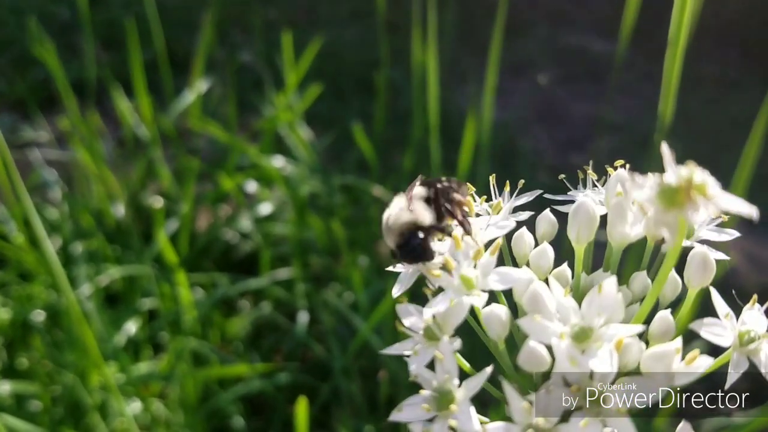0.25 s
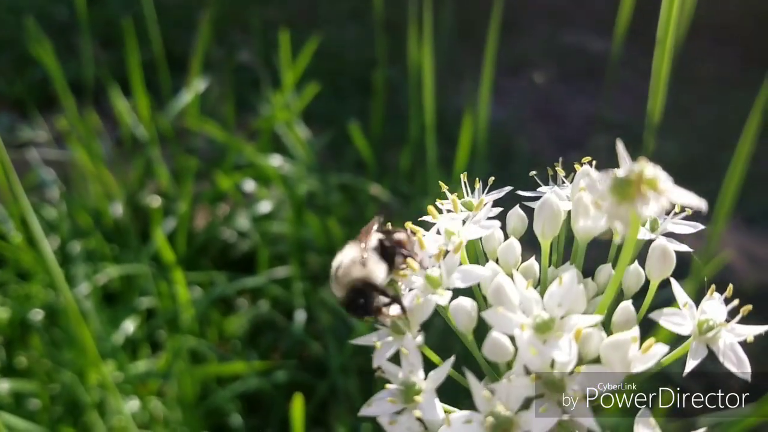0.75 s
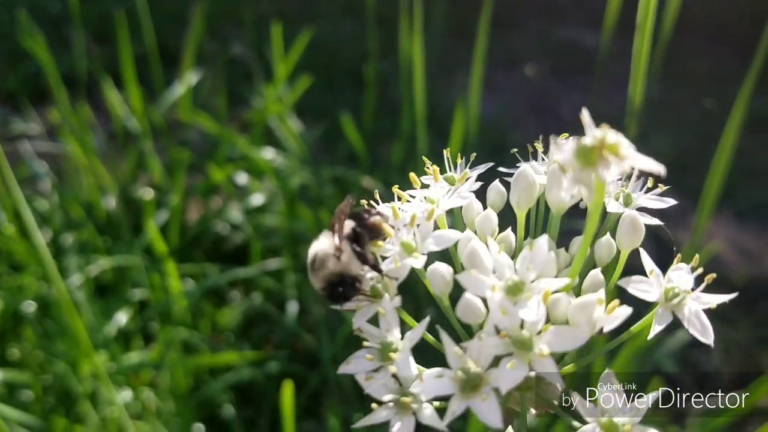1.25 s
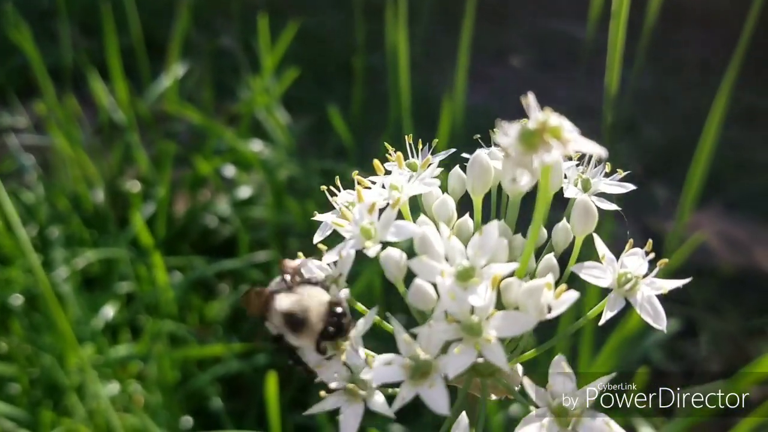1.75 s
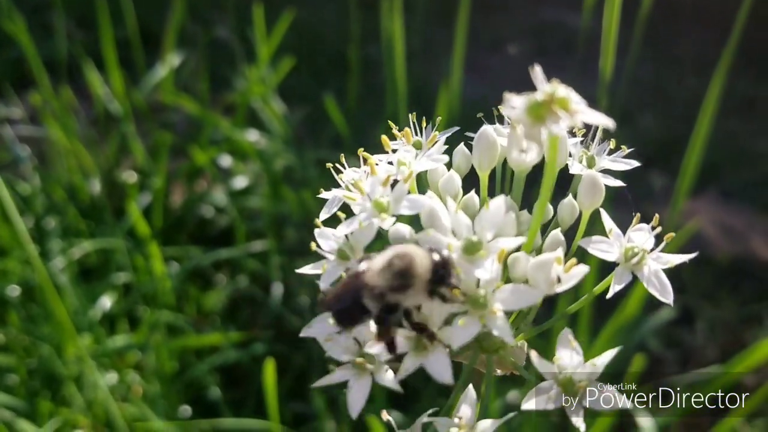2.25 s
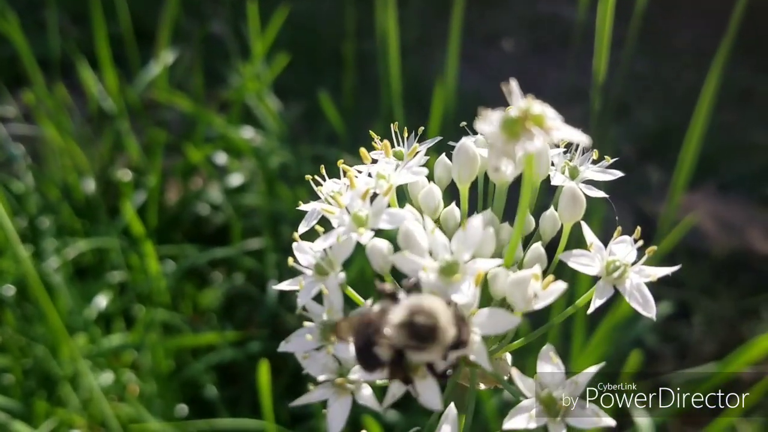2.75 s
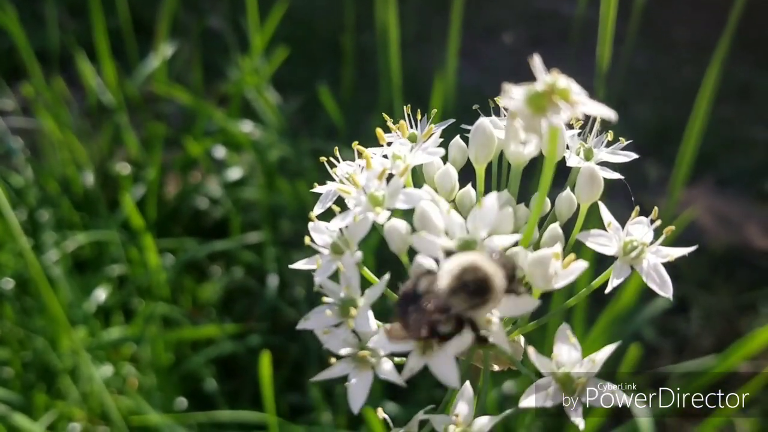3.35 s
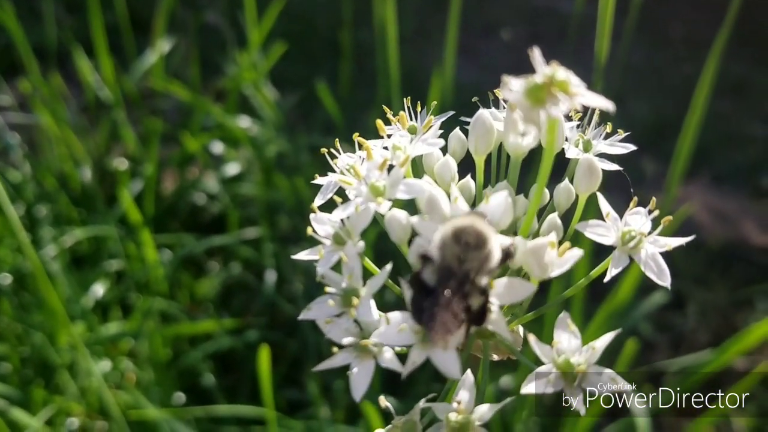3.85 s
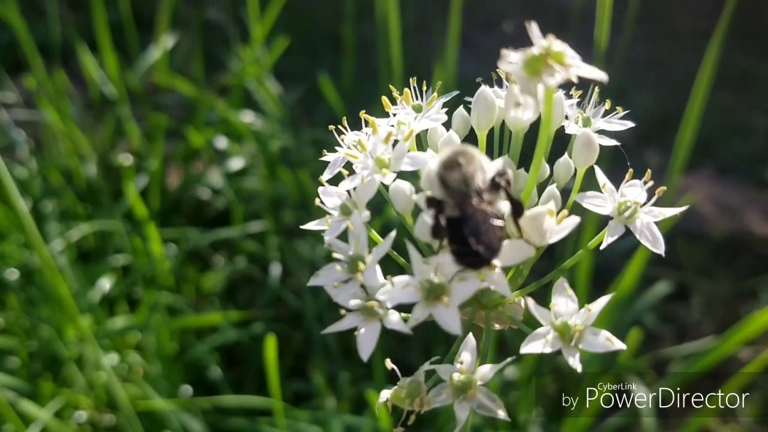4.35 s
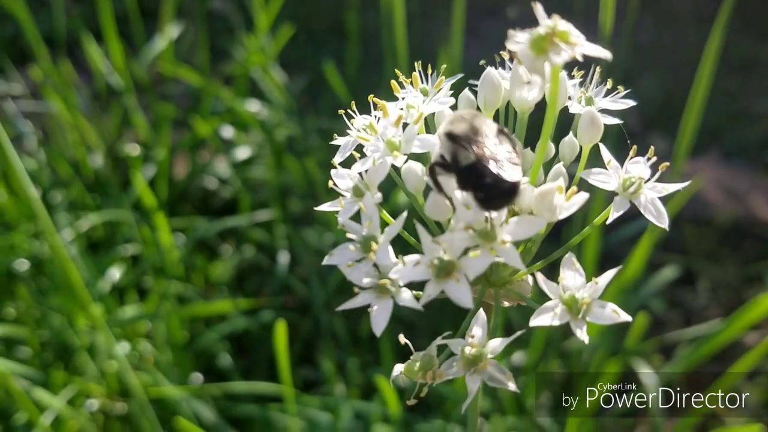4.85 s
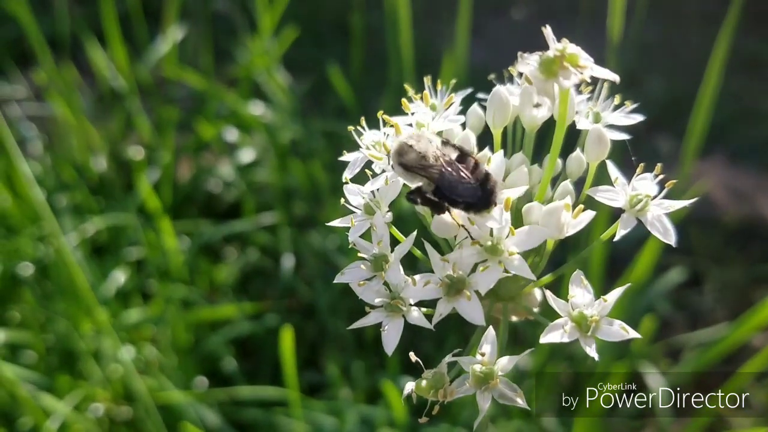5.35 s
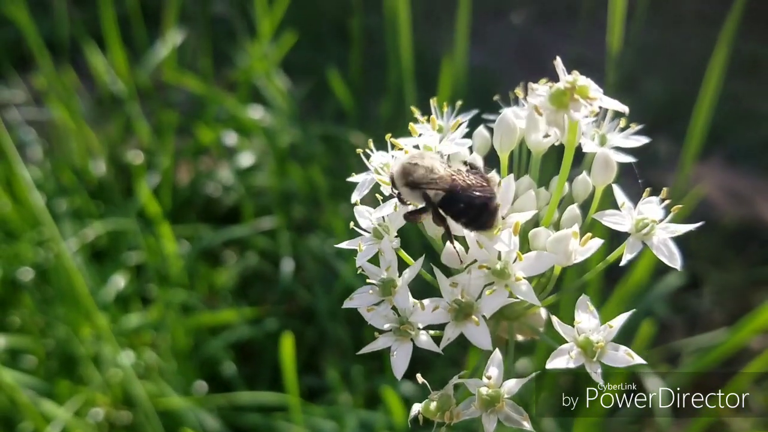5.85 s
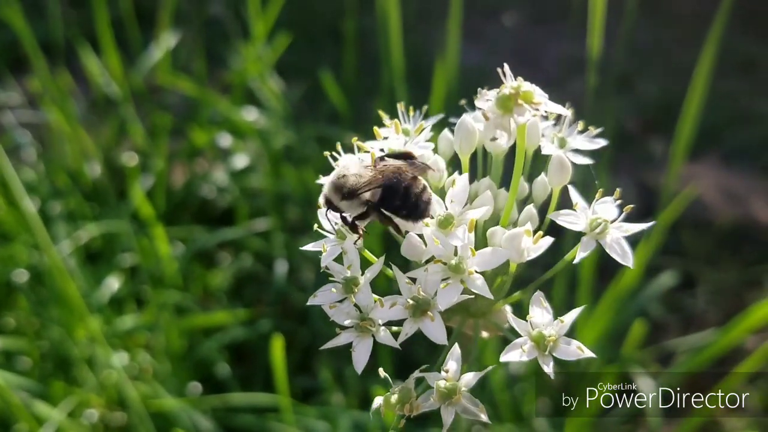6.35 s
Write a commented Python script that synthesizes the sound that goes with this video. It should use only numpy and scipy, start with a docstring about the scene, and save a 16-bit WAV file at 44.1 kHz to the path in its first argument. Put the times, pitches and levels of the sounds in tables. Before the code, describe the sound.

Outdoors in a grassy garden, a nearby cicada sings a shrill, rasping drone with rapid throbs. It swells until nearly three seconds, falters, then throbs faster while fading out before six. A steady far insect chorus remains, with faint high katydid rasps at the end. Low soft wind rumbles through the middle, and a cluster of dull knocks on the hand-held microphone lands around four and a half seconds.

```python
"""Cicada by a flower head

One cicada sings nearby: a tymbal's click train excites resonances, as a drone and quick throbs that swell
and die away; shaped noise stands for the song's high overtones. More of it makes a far insect chorus and
katydid rasps at the end. Low noise is wind on two microphone ports; damped sinusoids are soft knocks on
the hand-held body."""
import sys
import numpy as np
from scipy import signal
from scipy.fft import rfft, irfft
from scipy.io import wavfile
from scipy.ndimage import uniform_filter1d, map_coordinates

SR = 44100
rng = np.random.default_rng(int(sys.argv[2]) if len(sys.argv) > 2 else 0)


def persist_wave(psi):
    """Save psi, clipped to +-1, as 16-bit WAV."""
    counts = np.round(np.clip(psi, -1, 1) * 32767).astype(np.int16)
    wavfile.write(sys.argv[1], SR, np.atleast_2d(counts).T)


N = 291060

# tymbal action: (time [s], click rate [1/s], timing unevenness [fraction], basic share smeared into noise [0-1],
# early stroke relative level [dB])
TYMBAL_ACTION = [(0, 461.5, .007, .2, -6), (2.75, 461.5, .007, .2, -6), (3.05, 400, .02, .2, -10),
                 (3.3, 360, .015, .2, -12), (5.75, 350, .015, .2, -12)]
# phase between the ports, for song and far chorus: (frequency [Hz], lead of left over right [rad])
PORT_LEAD = [(0, -7.5), (1290, 4.5), (2930, -2), (3960, -3), (5340, -1.27), (5940, -2.5), (6290, -8.5),
             (6630, -1), (8700, -22), (13600, 26.5), (14600, 7), (15200, 29)]
LEFT_RIGHT = np.array([[.5], [-.5]])  # halves of a left-minus-right level difference


def amp(db):
    """Decibels are logarithmic: 20 dB is a tenfold gain."""
    return 10 ** (np.asarray(db) / 20)


def rms_one(x):
    """Normalise by the root of the mean power, to rms 1."""
    return x / np.sqrt(np.mean(x ** 2) + 1e-20)


def in_time(rows):
    """Linear interpolation of a table's columns over time, at every sample."""
    s, *columns = np.transpose(rows)
    return [np.interp(np.arange(N) / SR, s, column) for column in columns]


def at_hz(points):
    """Interpolation on a logarithmic frequency axis, at every FFT bin."""
    hz, value = np.transpose(points)
    bin_hz = np.arange(N // 2 + 1) * SR / N
    return np.interp(np.log(bin_hz + 1), np.log(hz + 1), value)


def colour(x, spectrum, peaks=()):
    """Source-filter principle: a spectral envelope with bell-shaped peaks or dips filters x; rms 1."""
    hz = np.arange(N // 2 + 1) * SR / N
    db = at_hz(spectrum)
    for centre_hz, width_hz, top_db in peaks:
        db = db + top_db / (1 + ((hz - centre_hz) / width_hz) ** 2)
    outside = (hz < spectrum[0][0]) | (hz > spectrum[-1][0])
    db[outside] -= 30
    return rms_one(irfft(rfft(x) * amp(db), N))


def drift(rate):
    """Band-limited chance: random knots, rate per second, joined by a smooth spline."""
    knots = rng.standard_normal(int(N / SR * rate) + 4)
    return map_coordinates(knots, [1 + np.arange(N) / SR * rate], order=2)


def sides(x, other, alike, lead=0, pan_db=0):
    """Coherence of two ports: the right hears x shifted in phase, partly replaced by another sound."""
    alike = np.clip(alike, 0, 1)
    shared = alike * rfft(x) * np.exp(-1j * lead)
    unshared = np.sqrt(1 - alike ** 2) * rfft(other)
    left = irfft(rfft(x) * amp(pan_db / 2), N)
    right = irfft((shared + unshared) * amp(-pan_db / 2), N)
    return np.array([left, right])


def pulses(times, levels_db, length_s, rise_s, fall_s):
    """Gate smoothing: averaging slopes each gate's edges, then a one-pole lag adds exponential decay."""
    gate = np.zeros(N)
    for s, db in zip(times, levels_db):
        gate[max(round(s * SR), 0):round((s + length_s) * SR)] = amp(db)
    gate = uniform_filter1d(gate, max(round(rise_s * SR), 1))
    pole = np.exp(-1 / (fall_s * SR))
    return signal.lfilter([1 - pole], [1, -pole], gate)


def cicada():
    """Resonant radiation: a drone hushes before each throb, which opens other resonances after a weak stroke."""
    # song: (time [s], drone level [dB], throb level [dB]), before gating, falters and pan
    song_levels = [(0, -37.5, -34), (.5, -36.3, -34.5), (1, -36.5, -31.5), (1.5, -34, -30.3),
                   (1.9, -32.5, -30), (2.78, -33.5, -31.5), (2.88, -36.5, -32.5), (3.5, -37, -33),
                   (4, -38.5, -34.5), (4.5, -41, -35), (4.9, -41.5, -37.5), (5.05, -46, -38.5),
                   (5.3, -49, -40), (5.62, -52, -41), (5.75, -61, -50)]
    # drone and throb envelopes: (frequency [Hz], relative density [dB per Hz])
    drone_tone = [(1700, -52), (2100, -28.5), (2630, -22), (3140, -14), (3950, -14), (4500, -15),
                  (4900, -9), (5500, -7.5), (5900, -0.5), (6300, -9), (6750, -13), (7200, -22), (8200, -53)]
    throb_tone = [(4300, -12.5), (4700, -8), (4900, -6), (5300, 2.5), (5600, -5), (5900, 0), (6400, 2),
                  (6800, -16.5), (7400, -22.5)]
    # drone and throb resonances, dips negative: (frequency [Hz], half-width [Hz], height [dB])
    drone_peaks = [(2790, 30, 7), (3210, 50, 6), (3492, 25, 6), (3687, 30, 6), (4000, 110, 7),
                   (4445, 45, 6), (4210, 45, -7), (3790, 25, -5), (6215, 65, 9), (6390, 35, -4),
                   (6490, 70, 8), (6620, 70, 4), (5400, 35, -5), (6030, 40, -4)]
    throb_peaks = [(4790, 20, 2), (5400, 30, -5), (4931, 25, 4), (5091, 40, 7), (5163, 20, 4),
                   (5307, 45, 3.5), (5552, 40, 7), (5762, 30, 4), (5925, 35, 5)]
    # port balance beyond the pan: (frequency [Hz], left minus right [dB])
    song_tilt = [(2000, 5.5), (4000, -6), (5000, -6.5), (6300, 6), (7500, 13.5)]
    # pan: (time [s], left minus right [dB])
    song_pan = [(0.0, -2), (1.63, -3), (2.05, -1), (4.16, -2), (5.4, -4)]

    drone_db, throb_db = in_time(song_levels)
    s, over_db = throbs()
    body = pulses(s, over_db, length_s=.023, rise_s=.0015, fall_s=.002)
    onset = pulses(s, over_db, length_s=.006, rise_s=.001, fall_s=.006)
    early = pulses(s - .019, over_db, length_s=.012, rise_s=.0035, fall_s=.0027)
    early_db = in_time(TYMBAL_ACTION)[3]
    throb = .72 * body + .25 * onset + amp(early_db) * early

    hush = pulses(s - .010, 0 * s, length_s=.011, rise_s=.003, fall_s=.0015)
    # during a throb the drone gives way
    give_way = pulses(s, 0 * s, length_s=.026, rise_s=.003, fall_s=.0014)
    drone_gain = amp(drone_db + .46 * drift(40)) * (1 - .31 * hush) * (1 - .31 * give_way)

    lead, tilt_db = at_hz(PORT_LEAD), at_hz(song_tilt)
    scattered = rng.standard_normal(N)
    rough, clear = tymbal(smear_more=.55), tymbal(smear_more=0)
    drone_pair = [colour(x, drone_tone, drone_peaks) for x in (rough, scattered)]
    throb_pair = [colour(x, throb_tone, throb_peaks) for x in (clear, scattered)]
    drone = sides(*drone_pair, alike=.59, lead=lead, pan_db=tilt_db)
    beat = sides(*throb_pair, alike=.89, lead=lead, pan_db=tilt_db)
    song = drone_gain * drone + amp(throb_db) * throb * beat

    pan_db, = in_time(song_pan)
    fade = np.clip((song_levels[-1][0] - np.arange(N) / SR) / .1, 0, 1)  # over the last 0.1 s of song
    return song * fade * amp(falter_db() + pan_db * LEFT_RIGHT)


def tymbal(smear_more):
    """Buckling membrane: it snaps in, then out with opposite sign and less force; leaves smear a share to noise."""
    per_s, uneven, smear, _ = in_time(TYMBAL_ACTION)
    cycle = np.floor(np.cumsum(per_s * (1 + uneven * drift(60))) / SR)
    way = np.where(cycle % 2, 1, -.4)
    strength = amp(.71 * rng.standard_normal(N)) * way
    clicks = rms_one(np.diff(cycle, prepend=0) * strength)
    smear = np.clip(smear + smear_more, 0, 1)
    return np.sqrt(1 - smear) * clicks + np.sqrt(smear) * rng.standard_normal(N)


def throbs():
    """Quasi-periodic rhythm: belly throbs keep a changing pace, slightly uneven in time and strength."""
    # pace, even between rows: (time [s], throbs counted so far [count])
    pace = [(.058, 0), (1.150, 13), (1.735, 20), (2.812, 33), (2.897, 34), (3.201, 38), (3.675, 45),
            (3.862, 48), (4.630, 60), (5.164, 68), (5.441, 72), (5.518, 73), (5.612, 74)]
    jitter_s, spread_db = .001, .7  # standard deviations
    s, counted = np.transpose(pace)
    number = np.arange(counted[-1] + 1)
    chance = rng.standard_normal((len(number), 2))
    times = np.interp(number, counted, s) + jitter_s * chance[:, 0]
    return times, spread_db * chance[:, 1]


def falter_db():
    """Amplitude modulation: the drone and throbs falter in short soft-edged drops as the song changes pace."""
    # falters: (time [s], length [s], drop [dB])
    falters = [(3.024, .03, 8.0), (3.097, .03, 5.0)]
    edge_s = .008
    t = np.arange(N) / SR
    drop = sum(db * ((t > s) & (t < s + length_s)) for s, length_s, db in falters)
    return -uniform_filter1d(drop, round(edge_s * SR))


def overtones():
    """Band-limited noise for the high overtones of the cicada's song: they waver, and fade as it ends."""
    # level: (time [s], mean level midway between ports [dB])
    overtone_levels = [(0.0, -53), (1.56, -53.5), (2.52, -52), (2.98, -54.5), (3.4, -53), (4.61, -55),
                       (4.87, -57), (6.13, -72)]
    # envelope: (frequency [Hz], relative density [dB per Hz])
    overtone_tone = [(5240, -87), (8900, -2), (10500, 3.5), (12700, 4), (14900, -2.5), (15500, -27)]
    pan_db = -2.5  # left minus right
    high = np.array([colour(w, overtone_tone) for w in rng.standard_normal((2, N))])
    level_db = in_time(overtone_levels)[0] + 1.0 * drift(7.3)
    return amp(level_db) * amp(pan_db * LEFT_RIGHT) * high


def knocks():
    """Damped oscillation: each knock dips, then rings at a sagging pitch; the soft contact dulls its edge."""
    # knocks on the body: (time [s], peak level midway between ports [dB], settled frequency [Hz],
    # ringing to fall 30 dB [cycles of that frequency])
    knock_rows = [(.770, -42.5, 193, 1.6), (0.824, -46, 152, 2.1), (.993, -46, 203, 3.4),
                  (2.125, -47, 228, 5.2), (4.3705, -29, 74.6, 3.9), (4.4089, -22, 87, 1.8),
                  (4.462, -37.5, 65, 5.8), (4.494, -49, 109, 3.3), (4.587, -34, 94, 6.4),
                  (4.603, -43.5, 328, 2.5), (4.609, -39.5, 410, 1.3), (4.611, -28, 94.5, 2.1),
                  (4.641, -38, 76, 4.0), (4.7256, -29, 183, 1.1), (5.205, -42.5, 171, 1.7),
                  (5.762, -49, 200, 1.7)]
    pan_db = -10  # left minus right
    out = np.zeros((2, N))
    t = np.arange(round(.12 * SR)) / SR
    for s, peak_db, hz, cycles in knock_rows:
        turns = hz * t + .46 * (1 - np.exp(-t * hz / .25))  # starts high, sags to hz
        onset = 1 - np.exp(-(t * hz / .19) ** 2)
        swing = -np.sin(2 * np.pi * turns) * onset * amp(-30 * t * hz / cycles)
        dull = signal.butter(4, max(430, 2.2 * hz), fs=SR, output="sos")
        swing = signal.sosfilt(dull, swing)
        at = round(s * SR)
        out[:, at:at + len(t)] += amp(peak_db + pan_db * LEFT_RIGHT) * swing / np.abs(swing).max()
    return out


def wind():
    """Turbulent pressure noise, stronger on the right port: one long gust rises from the calm, holds and drops."""
    # wind envelope: (frequency [Hz], relative density [dB per Hz])
    wind_tone = [(13, -43), (22, -16), (44, -3.5), (108, 1), (210, -8), (258, -14), (318, -20.5),
                 (350, -31.5), (400, -27.5), (520, -44), (880, -120)]
    calm_db, gust_db = -61.5, -49.5  # means midway between ports
    start_s, rise_s, end_s, fall_s = .89, .65, 4.67, .4
    turning_s = [start_s, start_s + rise_s, end_s, end_s + fall_s]
    level_db = np.interp(np.arange(N) / SR, turning_s, [calm_db, gust_db, gust_db, calm_db])
    gusts = [colour(w, wind_tone) for w in rng.standard_normal((2, N))]
    gain = amp(level_db + 1.2 * drift(25) + 1.0 * drift(3))
    return gain * sides(*gusts, alike=.72, pan_db=-5.0)


def garden():
    """Diffuse field of many sources as noise: near-steady far chorus and air, with late katydid rasps."""
    # far chorus and air: (frequency [Hz], relative density [dB per Hz])
    far_tone = [(25, -20), (60, -18), (110, -15), (250, -14.5), (330, -10), (500, -13.5), (972, -14),
                (1750, -18.5), (2100, -12.5), (3000, -7.5), (4000, -1.5), (5000, 0), (6700, -1), (7200, -9),
                (8700, -25.5), (10200, -10), (11000, -17), (15500, -23.5)]
    # their likeness between ports: (frequency [Hz], coherence [0-1])
    far_alike = [(60, 1), (250, 0.081), (600, 0.083), (1200, 0.42), (3000, 0.31), (9000, 0.29)]
    # their port balance: (frequency [Hz], left minus right [dB])
    far_pan = [(60, -6), (250, -4.5), (600, -1.3), (1400, -1), (2800, -4), (5500, -1.3), (10000, -2.8),
               (14000, -1.3)]
    far_db = -43
    katydid_start_s, katydid_period_s, katydid_db = 6.263, .0629, -49.3
    # (frequency [Hz], relative density [dB per Hz])
    rasp_tone = [(10800, -8), (12000, 0), (14000, 3), (15500, 0)]

    white = rng.standard_normal((4, N))
    far_pair = [colour(w, far_tone) for w in white[:2]]
    far = sides(*far_pair, at_hz(far_alike), at_hz(PORT_LEAD), at_hz(far_pan))
    rasp = np.array([colour(w, rasp_tone) for w in white[2:]])

    far_gain = amp(far_db + .8 * drift(9))
    s = np.arange(katydid_start_s, N / SR, katydid_period_s)
    rasp_gain = pulses(s, katydid_db + 0 * s, length_s=.0082, rise_s=.004, fall_s=.008)
    return far_gain * far + rasp_gain * rasp


def scene():
    """Superposition: the pressures of all sources add at the two ports."""
    return cicada() + overtones() + knocks() + wind() + garden()


def record(dry):
    """Band limiting: an elliptic low-pass cuts the top steeply; the converter sits a little off zero."""
    cutoff_hz, offset = 15560, -.0006  # offset in full scales
    steep = signal.ellip(12, .5, 60, cutoff_hz, fs=SR, output="sos")  # ripple and stopband in dB
    return signal.sosfilt(steep, dry) + offset


dry = scene()
out = record(dry)
persist_wave(out)
```